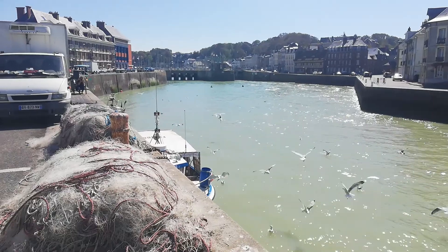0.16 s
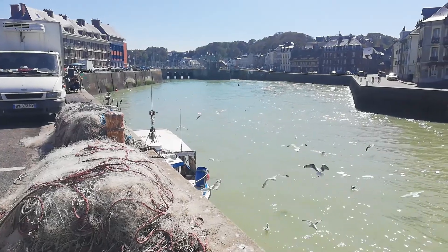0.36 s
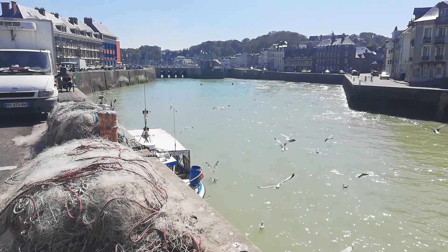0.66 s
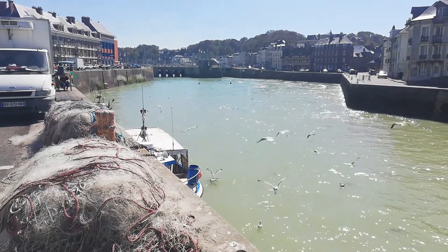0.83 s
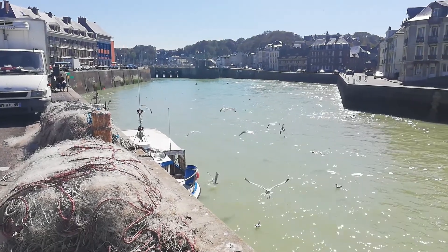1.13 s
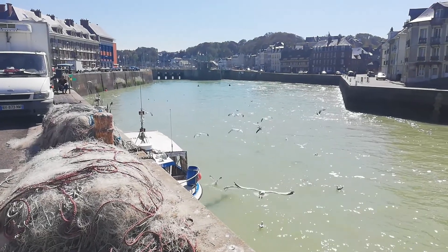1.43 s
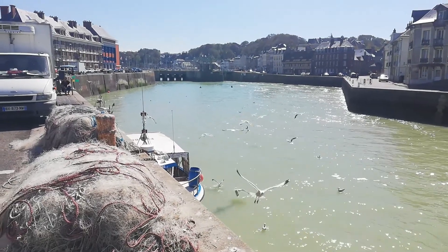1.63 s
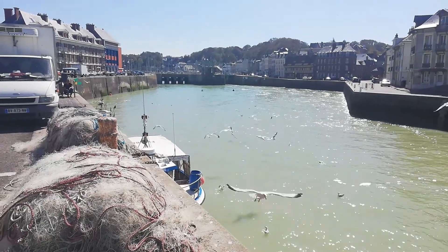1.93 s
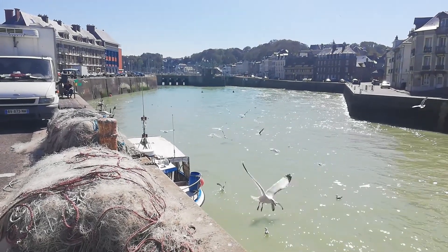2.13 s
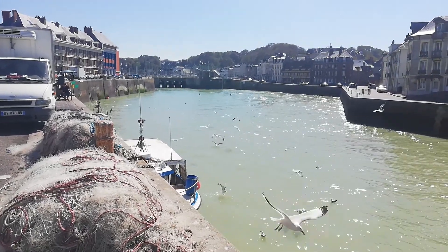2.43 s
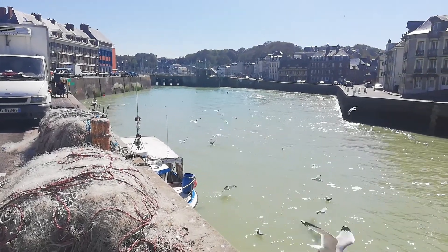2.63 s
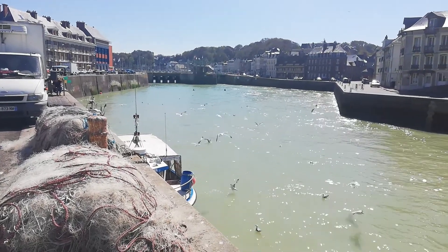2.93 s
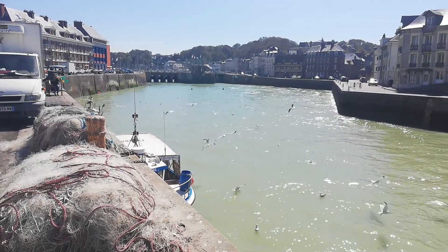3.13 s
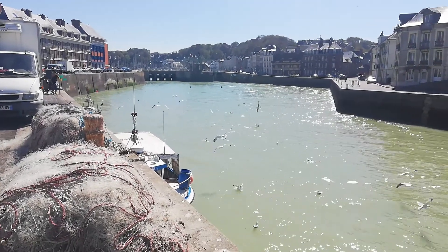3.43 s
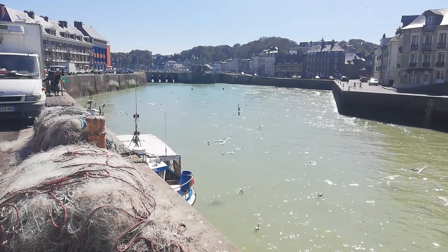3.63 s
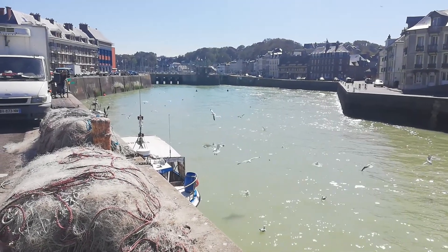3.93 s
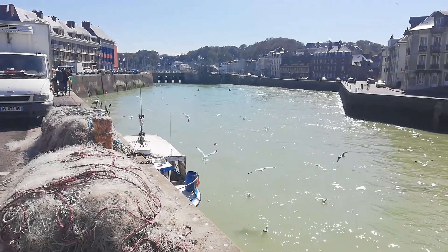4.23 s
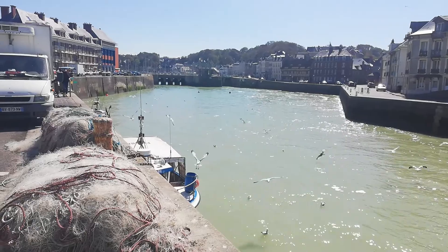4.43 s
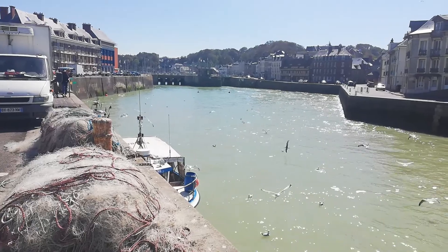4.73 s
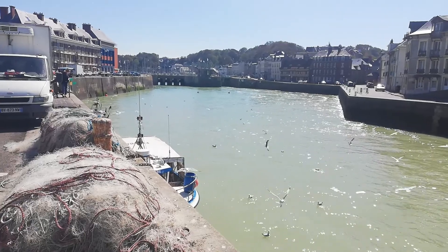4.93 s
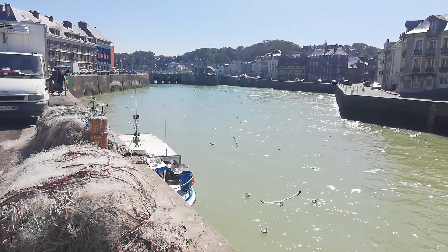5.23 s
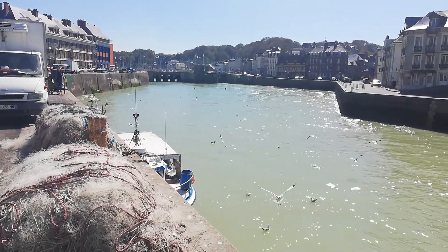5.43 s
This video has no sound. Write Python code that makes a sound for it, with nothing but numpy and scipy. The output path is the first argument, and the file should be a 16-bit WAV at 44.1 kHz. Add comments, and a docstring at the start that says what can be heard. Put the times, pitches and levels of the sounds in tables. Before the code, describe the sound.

Scattered gull cries, close short yelps and distant hoarse mews, echo softly between quay walls over deep rumble, watery wash and hiss.

```python
"""Gulls over a fishing harbour

Heard from the quay. A near gull gives thin peeps and short yelps: harmonic tones that break down through
its registers. Far gulls mew and squawk between house fronts: hoarse harmonics with scattered echoes.
An engine drones on two wavering sines. Shaped noise makes the town's wash, swelling hiss, gusts and ticks.
"""
import sys
import numpy as np
from scipy import signal
from scipy.fft import rfft, irfft
from scipy.io import wavfile
from scipy.ndimage import uniform_filter1d

SR = 44100
rng = np.random.default_rng(int(sys.argv[2]) if len(sys.argv) > 2 else 0)


def wav_out(sig):
    """Save sig, one row per channel (or a flat mono array), as 16-bit PCM at SR to the path in sys.argv[1]."""
    wavfile.write(sys.argv[1], SR, np.round(np.clip(np.atleast_2d(sig).T, -1, 1) * 32767).astype(np.int16))


N = 245751
T = np.arange(N) / SR
FREQS_HZ = np.maximum(np.arange(N // 2 + 1) * SR / N, 1)

# Event and layer levels are before the trims in their functions. lr_db = left minus right.

# Near gull's yelps: start_s (of the cry), squeak_hz, flip_end_hz, cry_hz, cry_s, rasp_hz, rasp_s,
# squeak_db, flip_db, cry_db, rasp_db, cry_tilt_db_per_octave, rasp_tilt_db_per_octave,
# rasp_roughness_0_1, lr_db
YELPS = [ (1.705, 4250, 3450, 2640, .009, 712, 0.014, -65, -37, -39.5, -39, -1, -21, 0, 4),
         (1.97, 4350, 3000, 2705, 0.02, 699, 0.021, -49, -62, -33.5, -39, -.5, -11, 0.45, 1.5),
         (2.354, 4220, 3070, 2598, .015, 678, 0.019, -48, -50, -32, -40, -14, -19, 0.4, -2.5),
         (2.688, 4220, 3380, 2707, 0.0082, 650, 0.0373, -56, -31, -37, -39.5, -10, 1, 0.86, 1),
         (3.011, 4300, 3140, 2620, 0.018, 652, 0.019, -41, -39.5, -36, -34.5, -13, -10, 0.33, 1),
         (3.344, 4430, 2996, 2710, 0.018, 657, 0.0225, -40.5, -46, -42.5, -37.5, -1, -13, 0.5, 1.5),
         (3.666, 4400, 3050, 2720, .013, 677, 0.027, -48, -46, -40.5, -33.5, 3, -3, 0.48, 1),
         (4.013, 3940, 2830, 2120, 0.015, 1382, 0.022, -40, -54, -35, -37, 0.5, -7.5, 0.2, 6)]
# Throat and open bill resonances: freq_hz, gain_db
THROAT = [(680, -47), (1380, -1.5), (2050, 5), (2750, 1.5), (3450, 5.5), (4250, 11), (4900, -3), (5500, -5),
          (6300, -16), (8300, -18), (11000, -25), (15000, -52)]
# Thin whistles: start_s, length_s, swell_share, start_hz, end_hz, level_db, lr_db, roughness_0_1
PEEPS = [ (0.047, 0.055, 0.5, 5430, 5200, -53, 5, 0.55), (0.086, 0.064, .2, 4500, 4580, -45.5, -5, 0.14),
         (0.139, 0.13, 0.094, 4620, 4360, -40, -4, 0.1), (0.263, 0.077, 0.16, 3930, 3820, -42.5, 18, 0.07),
         (1.301, 0.13, 0.58, 3740, 3533, -33.5, 21, 0.06), (1.483, 0.067, .3, 5200, 4980, -58, 4, 0.15),
         (1.566, 0.085, 0.34, 4980, 5080, -52.5, 4, .16), (1.632, 0.045, 0.5, 5900, 5560, -50, 0, 0.45),
         (1.658, 0.032, .2, 5400, 4980, -50, 2, 0.2), (2.047, 0.23, 0.41, 3930, 3800, -52, 11, 0.53),
         (2.426, 0.059, 0.54, 3500, 3400, -51, -11, 0.3), (2.74, 0.13, .2, 3800, 3740, -52.5, -18, 0.8),
         (4.303, .06, .3, 4130, 4120, -54, 0, 0.4), (4.41, 0.025, .3, 4380, 4260, -49, 0, .25),
         (5.292, 0.058, 0.25, 3300, 3230, -47, 3, 0.2), (5.294, .032, .4, 3780, 3690, -54, -4, .15)]
# Far hoarse calls: start_s, length_s, pitch_hz, resonance_start_hz, resonance_end_hz, level_db,
# roughness_0_1, upper_resonance_db, lr_db
SQUAWKS = [ (2.039, 0.36, 582, 1800, 1700, -46.5, 0.98, -24, 1),
           (2.39, 0.17, 612, 1910, 1750, -52, 0.55, -18, 1),
           (4.083, 0.18, 526.3, 1550, 1620, -45, 0.42, -15, -2.5),
           (4.192, 0.16, 335.5, 1350, 1200, -46, 0.81, -14, 3),
           (4.3, 0.18, 367.5, 1470, 1830, -47, 0.87, -11, 2),
           (4.316, .04, 510, 3500, 3300, -47, 0.44, -20, 5),
           (4.435, 0.043, 690, 3550, 3400, -49, 0.24, -20, 4),
           (5.0, 0.085, 492, 1750, 1830, -50, 0.77, -25, 1),
           (5.09, 0.085, 470, 1500, 1800, -52.5, 0.8, -20, -3),
           (5.155, 0.061, 530, 1700, 1580, -45, 0.6, -12, -1),
           (5.352, 0.141, 348.3, 2000, 1620, -62, 0.4, -22, 7),
           (5.55, 0.093, 720, 2900, 2850, -36.5, 0.65, -8, 4)]
# Far mews: start_s, length_s, pitch_hz, glide_octaves, level_db, step_db_per_harmonic, roughness_0_1, lr_db
MEWS = [ (0.202, 0.051, 1690, 0.32, -49, -16, 0.4, -4), (0.329, 0.096, 1002, -0.17, -48, -31, 0.3, -16),
        (0.954, 0.066, 1650, 0.08, -49, -30, 0.3, 7), (1.041, 0.18, 1690, -0.028, -51, -28, 0.55, 4),
        (1.399, 0.19, 1960, -0.15, -46.5, -28, 0.58, 0), (1.337, 0.077, 1082, -0.3, -44, -3, 0.4, 24),
        (1.45, 0.078, 1178, -0.12, -44.5, -13, 0.65, -6), (1.722, 0.35, 1954, 0.11, -46.5, -28, 0.95, -1),
        (2.142, 0.047, 990, -0.079, -45.5, -6, 0.3, 2), (2.305, 0.074, 1186, 0.092, -39, -10, 0.42, 2.5),
        (3.07, 0.28, 1638, -0.1, -48.5, -19, 0.71, -3), (4.134, 0.063, 1030, -0.12, -40, -14, 0.42, 18),
        (4.177, .11, 1270, .17, -46, -20, 0.4, 2), (4.187, 0.146, 1025, -0.081, -41.5, -14, 0.54, -8),
        (4.253, 0.047, 992, -0.23, -42.5, -22, 0.23, -1), (5.005, 0.072, 1450, -0.13, -50.5, -20, 0.54, -8),
        (5.203, 0.055, 1090, 0.0071, -45.5, 2, 0.17, -1), (5.259, .055, 1092, -0.002, -47, -1, 0.25, -1),
        (5.291, 0.088, 1090, -0.19, -49.5, -11, 0.24, 7), (5.305, 0.068, 2156, -0.5, -45.5, -28, 0.28, 5),
        (5.388, 0.07, 1030, -0.064, -54, -16, 0.1, -10), (5.398, 0.066, 1820, -.22, -52, -25, .35, 8)]
# Lag of a bird's sound at the right port: freq_hz, lag_rad
PORT_LAG = [(700, 3.1), (1150, 2.8), (1420, 5.64), (2050, 3.47), (2650, 4.04), (2850, 3.7), (3500, 4.44),
            (4250, 3.27), (4420, 3.95), (4600, 3.75), (5500, 5.9), (8500, 6.5)]
# Engine speed: time_s, firing_hz
ENGINE_RATE = [(0, 42.17), (2.1, 42.45), (2.5, 40.57), (3.0, 40.44), (4.0, 39.05), (4.8, 39.06),
               (5.57, 37.7)]
# Firing tone level: time_s, level_db
FIRING_LEVEL = [(0.0, -44), (0.11, -34.5), (0.37, -45.5), (0.67, -30), (0.71, -42), (1.49, -47),
                (1.58, -27.5), (1.81, -50), (1.97, -36), (2.59, -54), (3.05, -35), (3.71, -36.5),
                (3.85, -41), (4.5, -33.5), (4.71, -40), (5.57, -36)]
# Level of its octave: time_s, level_db
OCTAVE_LEVEL = [(0.0, -63), (0.16, -33.5), (0.27, -47), (0.59, -35), (1.19, -40), (1.25, -31),
                (1.38, -41.5), (1.59, -30.5), (1.71, -51), (1.82, -41), (2.87, -34), (2.92, -43),
                (3.53, -31.5), (3.58, -42.5), (4.38, -37), (5.4, -48.5)]
# Gusts on the microphone: start_s, length_s, level_db
GUSTS = [(0.848, 0.15, -39.5), (1.077, 0.077, -30.5), (1.131, 0.22, -31), (1.492, 0.061, -28),
         (1.554, 0.12, -36.5), (2.026, 0.094, -36), (4.216, 0.17, -39.5), (4.435, 0.12, -34),
         (4.565, 0.064, -35)]
# Gust spectrum: freq_hz, density_db_per_hz
GUST_COLOUR = [(25, -4), (60, -1.5), (85, 3), (115, 2), (190, -2.5), (270, -16.5), (450, -35.5), (900, -80)]
# Small dry ticks: start_s, level_db
TICKS = [(0.5372, -32), (3.873, -44), (3.927, -44), (4.336, -37), (5.42, -43), (5.445, -38.5)]
# Tick spectrum: freq_hz, density_db_per_hz
TICK_COLOUR = [(1500, -22), (2800, 3), (5000, -9), (8500, 5), (11500, -4), (15500, -20)]
# Swells of hiss: start_s, length_s, level_db, lr_db
SWELLS = [(2.773, 0.78, -52.5, -4.5), (4.058, 0.34, -48.5, -4.5), (4.218, 0.33, -47, 2.5),
          (4.634, 0.22, -57.5, -1), (5.024, 0.046, -54, -1), (5.055, 0.2, -49.5, -2), (5.35, 0.16, -57, -1)]
# Hiss under the swells: time_s, body_db, top_db, top_lr_db
HISS = [(0, -53, -58, 3), (1.8, -54, -56, 0.5), (2.3, -50, -57, 1), (2.9, -51, -55.5, -4),
        (3.8, -58, -60.5, 0.5), (4.6, -56, -58, 0.5), (4.93, -63.5, -63.5, 2), (5.3, -55, -56, 3),
        (5.57, -58.5, -60.5, 3)]
# Hiss body spectrum: freq_hz, density_db_per_hz
HISS_COLOUR = [(1800, -52), (2500, 3), (2900, 8), (3300, 8), (3800, 8), (4500, 6.5), (5200, 3), (6000, 0.5),
               (7500, -5.5)]
# Fine top spectrum: freq_hz, density_db_per_hz
TOP_COLOUR = [(4500, -56), (5600, -3.5), (6900, 4.5), (7900, 5.5), (8700, 8.5), (9400, 10), (10100, 7),
              (10800, 1.5), (12900, -3.5), (14700, -10.5), (15700, -14)]
# Town layers: time_s, rumble_db, road_db, wash_db
TOWN = [(0, -43, -58, -49.5), (1.1, -39, -53, -46), (1.7, -39, -52, -46.5), (2.1, -38.5, -49.5, -48.5),
        (2.8, -41, -52, -45.5), (3.25, -41.5, -54.5, -46), (3.7, -45.5, -55.5, -51),
        (4.3, -37.5, -53, -49.5), (4.88, -41.5, -62, -55), (5.05, -45.5, -56.5, -51), (5.5, -42, -62, -54)]
# Rumble spectrum: freq_hz, density_db_per_hz
RUMBLE_COLOUR = [(14, -15), (28, 0.5), (55, 5), (80, 7.5), (110, 4), (160, -1.5), (220, -3), (300, -19.5),
                 (450, -55)]
# Road noise spectrum: freq_hz, density_db_per_hz
ROAD_COLOUR = [(200, -4), (300, 3), (400, -1.5), (520, -7.5), (700, -31)]
# Wash spectrum: freq_hz, density_db_per_hz
WASH_COLOUR = [(400, -14.5), (600, -1), (820, -0.5), (1020, 1), (1250, 0), (1610, 2.5), (1950, 1.5),
               (2440, -5.5), (3200, -8.5), (4200, -37)]
# Stereo width of the noises: freq_hz, side_minus_mid_db
WIDTH = [(60, -21), (110, -11.5), (200, -10), (380, 0), (700, 5.5), (1290, -0.5), (2380, 0), (4400, 0),
         (8120, 0.5), (15000, -0.5)]

SQUEAK_LEAD_S, SQUEAK_S = 0.036, 0.0255  # thin note that opens a yelp
FLIP_RATIO, FLIP_S = 1.35, 0.011  # slide towards the cry: start pitch over cry pitch, length
SHARP_SHARE = 0.0602  # squeak, cry and rasp start this share sharp
CRY_ROUGHNESS, RASP_START_SHARE = 0.15, 0.4  # 0-1; share of its roughness with which a rasp begins
RASP_FADE_DB, THROAT_CLOSING = 7, 0.13  # over a rasp: fall in level, share by which resonances drop
GRAIN_DB, GRAIN_DECAY_S = -16, 0.03  # hoarse grain around a yelp's end, relative to its rasp
UPPER_THROAT_HZ = 3430  # second resonance of a squawk
SQUAWK_HALF_WIDTH_OCTAVES, SQUAWK_SHARP_SHARE = 0.32, 0.07
MEW_ARCH_OCTAVES = 0.0503  # both ends of a mew lie this far under its middle
FAR_LAG_RAD = 0.6  # far birds call from another bearing
BASIN_DB, BASIN_T60_S = -21.5, 2.0  # faint echo of the whistles
SWELL_RISE, SWELL_FALL = 0.43, 0.17  # shares of a swell's length
TOP_HZ = 15750


def undb(db):
    """Decibels to gain."""
    return 10 ** (np.asarray(db) / 20)


def unit(x):
    """Scale to rms 1."""
    return x / np.sqrt(np.mean(x ** 2))


def curves(table):
    """Columns of a timed table, interpolated to one value per sample."""
    time_s, *columns = np.transpose(table)
    return [np.interp(T, time_s, column) for column in columns]


def colour(points, hz):
    """Gain of a (Hz, dB) spectrum; beyond its ends it falls 20 dB per octave."""
    point_hz, db = np.transpose(points)
    below_octaves = np.maximum(np.log2(point_hz[0] / hz), 0)
    above_octaves = np.maximum(np.log2(hz / point_hz[-1]), 0)
    return undb(np.interp(np.log(hz), np.log(point_hz), db) - 20 * (below_octaves + above_octaves))


def walk(rate_hz, size=N):
    """Smooth random wandering: held noise, averaged twice, spread near 1."""
    hold = max(int(SR / rate_hz), 1)
    held = np.repeat(rng.standard_normal(size // hold + 2), hold)
    smooth = uniform_filter1d(uniform_filter1d(held, hold), hold)
    return np.sqrt(2) * smooth[hold // 2:hold // 2 + size]


def glide(length_s, start_hz, end_hz, settle=1.744):
    """Pitch that starts off the mark and settles."""
    return end_hz + (start_hz - end_hz) * np.linspace(1, 0, int(length_s * SR)) ** settle


def pan(lr_db):
    """Left and right gains of equal total power."""
    gains = undb(np.array([lr_db, -lr_db]).reshape(2, -1) / 2)
    return gains / np.sqrt(np.mean(gains ** 2, axis=0))


def add(out, start_s, sound):
    """Mix a sound in at start_s."""
    start = max(int(start_s * SR), 0)
    part = sound[:, :max(N - start, 0)]
    out[:, start:start + part.shape[1]] += part


def air(points, likeness=0.6):
    """Coloured stereo noise; part of it reaches the two ports alike but out of step."""
    mid, own = rfft(rng.standard_normal((2, N))) * colour(points, FREQS_HZ)
    share = np.clip(likeness, 0, 1)
    width_hz, width_db = np.transpose(WIDTH)
    width = undb(np.interp(FREQS_HZ, width_hz, width_db))
    # 1j: a quarter turn out of step
    side = width * (1j * share * mid + np.sqrt(1 - share ** 2) * own)
    return irfft(np.array([mid + side, mid - side]), N) / np.std(irfft(mid, N))


def voice(hz, gains, rough, jitter=0.0502, shimmer=0.97, ragged=1.0, extra_lag_rad=0):
    """Membrane harmonics with wavering period and swing, each fluttering, lagged at the right port."""
    size = len(hz)
    phase = 2 * np.pi * np.cumsum(hz * (1 + jitter * rough * walk(900, size=size))) / SR
    lag_hz, lag_rad = np.transpose(PORT_LAG)
    tone = np.zeros((2, size))
    for k, gain in enumerate(gains, 1):
        if k * hz.max() >= SR / 2:
            continue
        flutter = 1 + ragged * rough * walk(250.5, size=size)
        lag = np.array([[0], [np.interp(k * hz.mean(), lag_hz, lag_rad) + extra_lag_rad]])
        tone += gain * flutter * np.cos(k * phase + 2 * np.pi * rng.random() - lag)
    return unit(tone * (1 + shimmer * rough * walk(600, size=size)))


def quays(x, t60_s=0.7, gap_s=0.0035):
    """Scattered echoes from quay walls and house fronts, duller than the direct sound."""
    t = T[:SR]
    tail = rng.standard_normal((2, SR)) * undb(-60 * t / t60_s) * (1 - np.exp(-t / gap_s))
    tail = signal.sosfilt(signal.butter(1, 3000, fs=SR, output="sos"), tail)
    return signal.fftconvolve(x, unit(tail) / np.sqrt(SR), axes=1)[:, :N]


def near_gull(edge_s=0.002, turbulence_gain=0.6, gain_db=1.0, clear_rough=0.27):
    """Yelps: a squeak, a flip down, a cry, then a rasp breaking into grain as the throat closes."""
    out = np.zeros((2, N))
    turbulence = air(THROAT, likeness=0.19)
    harmonics = np.arange(1, 13)[:, None]
    sharp = 1 + SHARP_SHARE
    for (s, squeak_hz, flip_end_hz, cry_hz, cry_s, rasp_hz, rasp_s, squeak_db, flip_db, cry_db, rasp_db,
         cry_tilt_db, rasp_tilt_db, rasp_rough, lr_db) in YELPS:
        # start_s, length_s, start_hz, end_hz, level_db, roughness, tilt_db_per_octave, edge_s, closing_0_1
        registers = [
            (s - SQUEAK_LEAD_S, SQUEAK_S, squeak_hz * sharp, squeak_hz, squeak_db, clear_rough, 0,
             SQUEAK_S / 2, 0),
            (s - FLIP_S, FLIP_S, cry_hz * FLIP_RATIO, flip_end_hz, flip_db, clear_rough, 0, edge_s, 0),
            (s, cry_s, cry_hz * sharp, cry_hz, cry_db, CRY_ROUGHNESS, cry_tilt_db, edge_s, 0),
            (s + cry_s, rasp_s, rasp_hz * sharp, rasp_hz, rasp_db, rasp_rough, rasp_tilt_db, edge_s, 1)]
        for start_s, length_s, start_hz, end_hz, db, rough, tilt_db, fade_s, closing in registers:
            hz = glide(length_s + edge_s, start_hz, end_hz)
            closed = closing * np.linspace(-0.5, 0.5, len(hz))
            hoarse = rough * np.linspace(RASP_START_SHARE if closing else 1, 1, len(hz))
            # moving the harmonics up the spectrum equals moving the resonances down
            gains = colour(THROAT, hz * harmonics * (1 + THROAT_CLOSING * closed))
            gains = gains * undb(tilt_db * np.log2(harmonics))
            breath = turbulence[:, int(start_s * SR):][:, :len(hz)]
            cry = voice(hz, gains, hoarse, shimmer=1.0) + turbulence_gain * hoarse * breath
            swing = signal.windows.tukey(len(hz), min(2 * fade_s / length_s, 1))
            swing = swing * undb(-RASP_FADE_DB * closed)
            add(out, start_s - edge_s / 2, unit(cry) * swing * undb(db + gain_db) * pan(lr_db))
        from_end_s = T - (s + cry_s + rasp_s)
        grain = np.exp(-np.abs(from_end_s) / GRAIN_DECAY_S) * rasp_rough * undb(rasp_db + GRAIN_DB)
        out += turbulence * grain
    return out


def peeps(stop_s=0.0075, gain_db=1.5, flutter_db=-1.25):
    """Whistles: a single harmonic that swells in and stops short."""
    out = np.zeros((2, N))
    for s, length_s, swell, start_hz, end_hz, db, lr_db, rough in PEEPS:
        hz = glide(length_s, start_hz, end_hz)
        t = T[:len(hz)]
        swing = np.minimum(t / (swell * length_s), 1) * np.minimum((length_s - t) / stop_s, 1)
        swing = swing * undb(flutter_db * walk(75, size=len(t)))
        add(out, s, voice(hz, [1], rough) * swing * undb(db + gain_db) * pan(lr_db))
    return out


def squawks(gain_db=0, flutter_db=1.5):
    """Hoarse harmonics under a sliding throat resonance and a weaker fixed one."""
    out = np.zeros((2, N))
    harmonics = np.arange(1, 13)[:, None]
    for s, length_s, pitch_hz, start_hz, end_hz, db, rough, upper_db, lr_db in SQUAWKS:
        hz = glide(length_s, pitch_hz * (1 + SQUAWK_SHARP_SHARE), pitch_hz)

        def resonance(centre_hz):
            """Bell over octaves from the centre."""
            return 1 / (1 + (np.log2(hz * harmonics / centre_hz) / SQUAWK_HALF_WIDTH_OCTAVES) ** 2)

        sliding = resonance(np.geomspace(start_hz, end_hz, len(hz)))
        gains = sliding + undb(upper_db) * resonance(UPPER_THROAT_HZ)
        swing = signal.windows.tukey(len(hz), 0.5) * undb(flutter_db * walk(67, size=len(hz)))
        call = voice(hz, gains, rough, shimmer=0.5, extra_lag_rad=FAR_LAG_RAD)
        add(out, s, call * swing * undb(db + gain_db) * pan(lr_db))
    return out


def mew(length_s, pitch_hz, octaves, step_db, rough):
    """Arched, hoarse cry; only its first three harmonics carry across the water."""
    u = np.linspace(-1, 1, int(length_s * SR))
    hz = pitch_hz * 2 ** (octaves * u / 2 - MEW_ARCH_OCTAVES * u ** 2)
    cry = voice(hz, undb(step_db * np.arange(3)), rough, extra_lag_rad=FAR_LAG_RAD)
    return cry * signal.windows.tukey(len(u), 0.5)


def far_gulls():
    """Single mews that stand out of the flock."""
    out = np.zeros((2, N))
    for s, length_s, pitch_hz, octaves, db, step_db, rough, lr_db in MEWS:
        add(out, s, mew(length_s, pitch_hz, octaves, step_db, rough) * undb(db) * pan(lr_db))
    return out


def engine(firing_db=-1, octave_db=-2.0, waver_db=1.0, lag_s=0.000059):
    """Slow diesel off to the left: wavering firing tone and octave, later at the right port."""
    (hz,), (first_db,), (second_db,) = curves(ENGINE_RATE), curves(FIRING_LEVEL), curves(OCTAVE_LEVEL)
    cycles = np.cumsum(hz * (1 + 0.033 * walk(20))) / SR
    phase = 2 * np.pi * (cycles - hz * np.array([[0], [lag_s]]))
    firing = undb(first_db + firing_db + waver_db * walk(7.2)) * np.sin(phase)
    octave = undb(second_db + octave_db + waver_db * walk(13)) * np.sin(2 * phase)
    return np.sqrt(2) * (firing + octave)


def gusts(gain_db=1):
    """Short eddies thump on the microphone ports: low noise in smooth bursts."""
    strength = np.zeros((1, N))
    for s, length_s, db in GUSTS:
        add(strength, s, undb(db + gain_db) * signal.windows.tukey(int(length_s * SR), 0.6)[None])
    return strength * air(GUST_COLOUR, likeness=1.0)


def ticks(decay_s=0.0017):
    """Small dry ticks close by: noise with instant onset and exponential decay."""
    strength = np.zeros(N)
    for s, db in TICKS:
        strength += undb(db) * (T >= s) * np.exp(-np.abs(T - s) / decay_s)
    return air(TICK_COLOUR, likeness=0) * strength


def hiss(body_db=0, fine_db=2, swell_body_db=-4):
    """Wind and water hiss; swells rise slowly, sink fast and lift the fine top most."""
    mid_db, top_db, lr_db = curves(HISS)
    swell_power = np.zeros((2, N))
    for s, length_s, db, swell_lr_db in SWELLS:
        u = (T - s) / length_s
        shape = np.clip(np.minimum(u / SWELL_RISE, (1 - u) / SWELL_FALL), 0, 1)
        swell_power += (shape * undb(db) * pan(swell_lr_db)) ** 2
    swell = np.sqrt(swell_power)
    body = air(HISS_COLOUR, likeness=0.33) * np.hypot(undb(mid_db), swell * undb(swell_body_db))
    top = air(TOP_COLOUR, likeness=0.3) * np.hypot(undb(top_db) * pan(lr_db), swell)
    return body * undb(body_db + 1.0 * walk(24.72)) + top * undb(fine_db + 0.94 * walk(44))


def flock(count=110, low_hz=1100, span_hz=1000, shortest_s=0.0271, extra_s=0.0772, octaves=-0.116,
          spread_db=8):
    """Many faint mews from the far end of the basin, at random times, pitches and levels."""
    out = np.zeros((2, N))
    for when, pitch, length, distance, side in rng.random((count, 5)):
        cry = mew(shortest_s + extra_s * length, low_hz + span_hz * pitch, octaves, step_db=-5.0, rough=0.45)
        add(out, when * N / SR, cry * undb(-spread_db * distance) * pan(8 * (side - 0.5)))
    return unit(out)


def town(road_trim_db=1, wash_trim_db=-1.0, flock_db=-13):
    """Traffic rumble, road noise and broad wash as wavering noise, with the far flock mingled in."""
    rumble_db, road_db, wash_db = curves(TOWN)
    rumble = air(RUMBLE_COLOUR, likeness=0.39) * undb(rumble_db + 1.75 * walk(14))
    road = air(ROAD_COLOUR, likeness=0.51) * undb(road_db + road_trim_db + 1.33 * walk(12))
    wash = air(WASH_COLOUR, likeness=0.96) * undb(wash_trim_db + 1.1 * walk(22.17))
    birds = quays(flock(), t60_s=0.19) * undb(flock_db)
    return rumble + road + (wash + birds) * undb(wash_db) * pan(2.75)


def scene():
    """Close whistles and yelps, echoing far birds, whistles lingering across the basin, then the bed."""
    whistles, yelps, far = peeps(), near_gull(), far_gulls() + squawks()
    direct = whistles + yelps + undb(-1.0) * far
    echoes = quays(undb(-16.5) * yelps, t60_s=0.47) + quays(undb(-10) * far, t60_s=0.46)
    basin = quays(undb(BASIN_DB) * whistles, t60_s=BASIN_T60_S, gap_s=0.007)
    return direct + echoes + basin + engine() + gusts() + town() + hiss() + ticks()


def record(dry):
    """Steep elliptic low-pass at TOP_HZ."""
    return signal.sosfilt(signal.ellip(10, 0.1, 80, TOP_HZ, fs=SR, output="sos"), dry)


dry = scene()
out = record(dry)
wav_out(out)
```